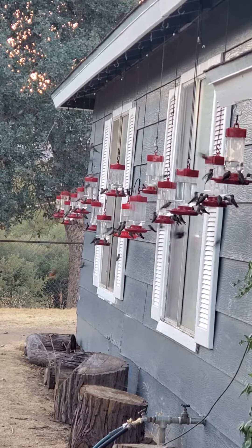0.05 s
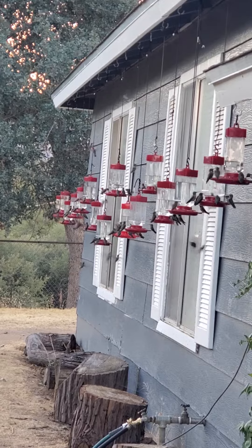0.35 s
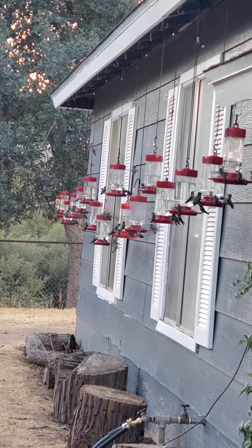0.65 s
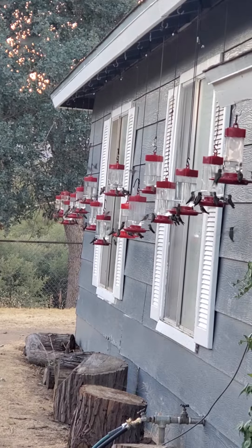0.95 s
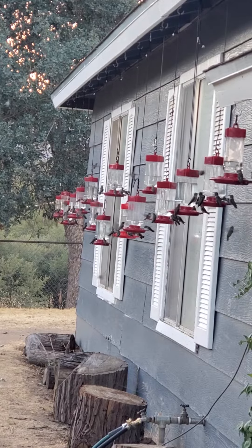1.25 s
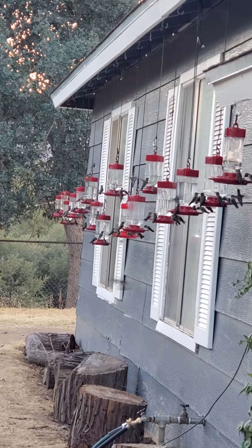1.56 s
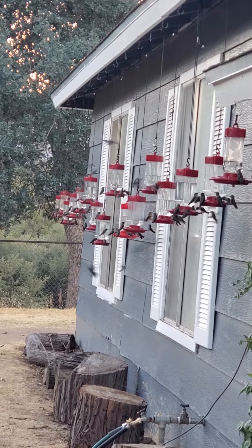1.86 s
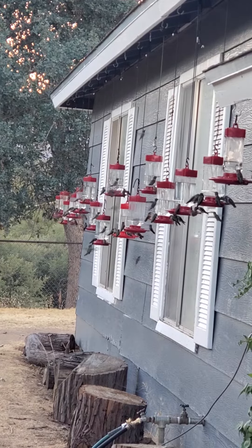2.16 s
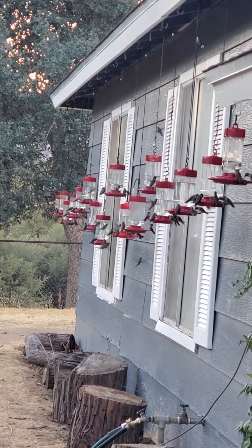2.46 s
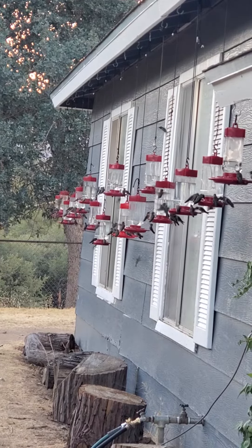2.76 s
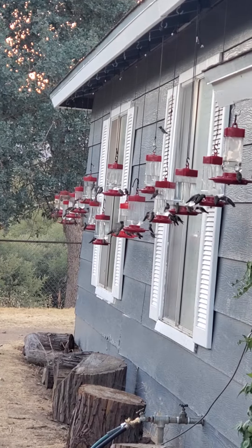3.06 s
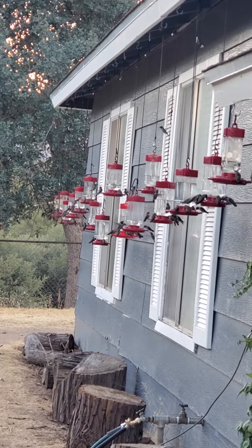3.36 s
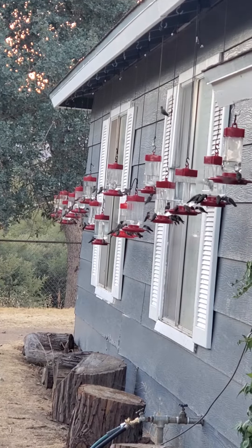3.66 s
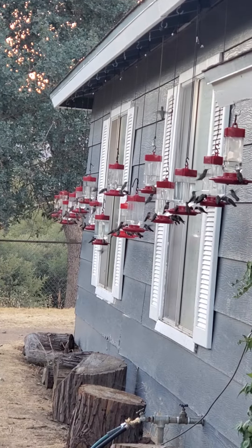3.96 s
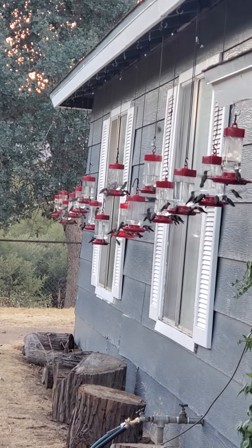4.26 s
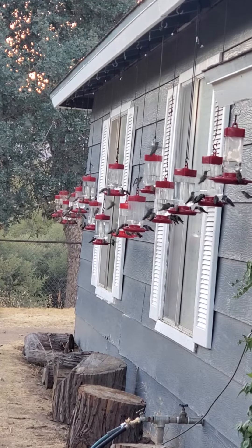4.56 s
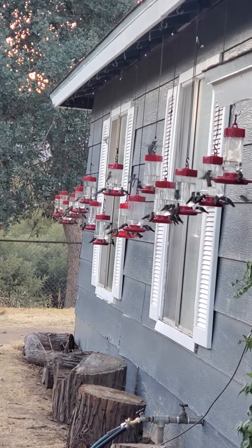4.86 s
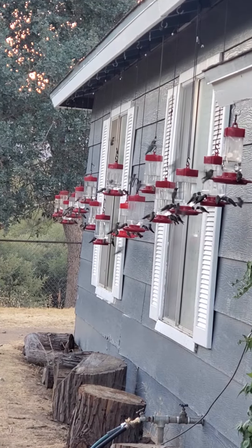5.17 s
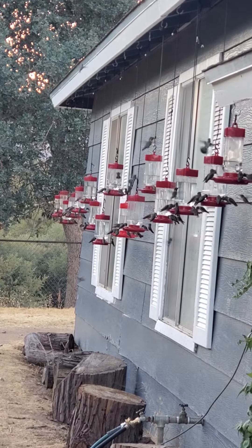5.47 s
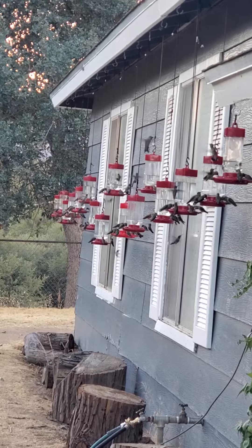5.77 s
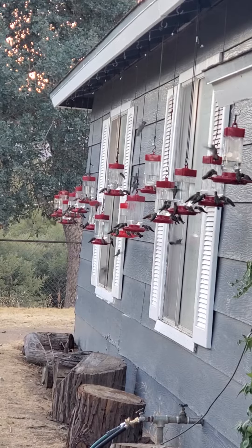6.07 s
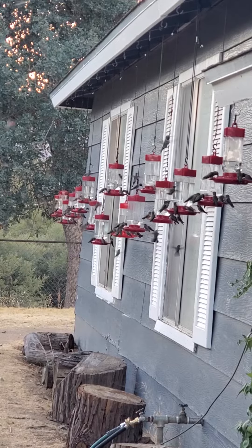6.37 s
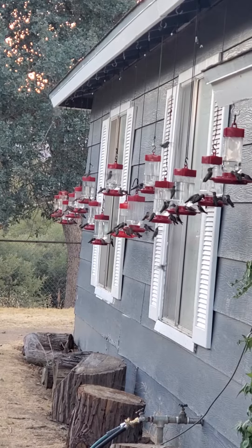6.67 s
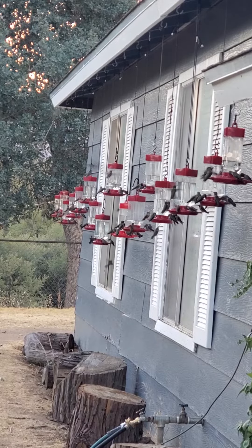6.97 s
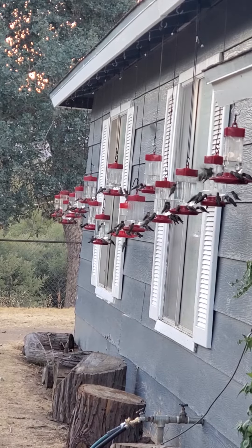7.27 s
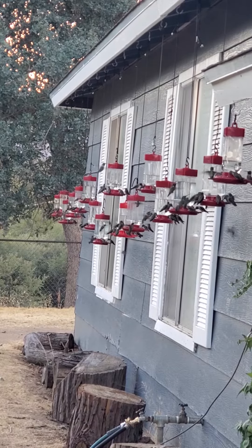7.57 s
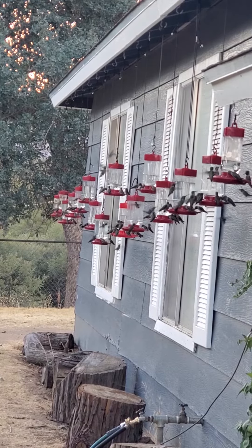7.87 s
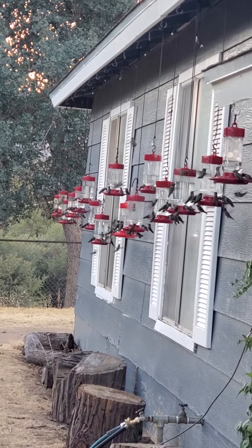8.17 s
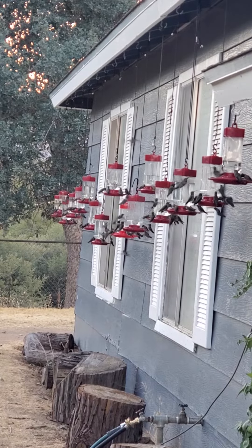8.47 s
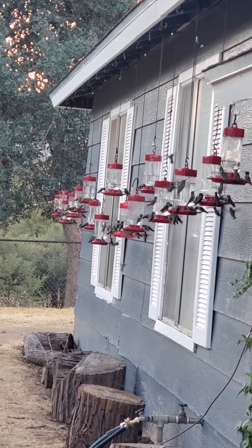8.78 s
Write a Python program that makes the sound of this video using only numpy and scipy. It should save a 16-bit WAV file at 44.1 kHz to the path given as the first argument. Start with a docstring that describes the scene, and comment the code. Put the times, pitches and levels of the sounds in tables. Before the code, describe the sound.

A crowd of hummingbirds squeaks and chatters around outdoor feeders while their wings hum and single birds whir past.

```python
"""Outdoors by a house wall, close to feeders crowded with hummingbirds, on a stereo microphone.
Their wings merge into a low hum over the hush of open air, and now and then one flies close by.
They chip, scold and buzz at each other with fast pitch sweeps of the syrinx, rasping with air;
others twitter at the far feeders. Wall, eaves and feeders scatter every call into short echoes."""
import sys
import numpy as np
from scipy import signal
from scipy.fft import rfft, irfft, next_fast_len
from scipy.io import wavfile
from scipy.ndimage import map_coordinates

SR = 44100
rng = np.random.default_rng(int(sys.argv[2]) if len(sys.argv) > 2 else 0)


def store_pcm(level_fs):
    """Save levels as 16-bit WAV."""
    pcm = np.round(np.clip(level_fs, -1, 1) * 32767).astype(np.int16)
    wavfile.write(sys.argv[1], SR, np.atleast_2d(pcm).T)


N = 393813
CALL_T = np.arange(SR // 4) / SR  # time within one call [s]


def amp(db):
    """Decibels to gain."""
    return 10 ** (np.asarray(db) / 20)


def unit(x):
    """x at rms 1."""
    return x / np.sqrt(np.mean(x ** 2) + 1e-20)


def along(points, hz):
    """Read (frequency, value) points at hz, on a log axis."""
    freqs, values = np.transpose(points)
    return np.interp(np.log(hz + 1), np.log(freqs + 1), values)


def wobble(rate, size=len(CALL_T), step=16):
    """A smooth random curve, rate knots a second."""
    knots = rng.standard_normal(int(max(size, len(CALL_T)) * rate / SR) + 4)
    coarse = np.arange(0, size + step, step)
    return np.interp(np.arange(size), coarse, map_coordinates(knots, [coarse * rate / SR]))


def filtered(x, response):
    """x through a gain that depends on frequency."""
    size = next_fast_len(N + SR // 4)
    return irfft(rfft(x, size) * response(np.fft.rfftfreq(size, 1 / SR)), size)[..., :N]


def spread(pair, spectrum):
    """Two signals, as mid and side, become a coloured stereo field of rms 1, near mono in the bass."""
    # how alike left and right are: (frequency [Hz], correlation)
    likeness = [(100, 0.95), (300, 0.92), (700, 0.62), (2000, 0.18), (8000, 0.24)]
    turn = lambda hz: np.arccos(np.clip(along(likeness, hz), -1, 1)) / 2
    mid, side = filtered(pair, lambda hz: amp(along(spectrum, hz)) * [np.cos(turn(hz)), np.sin(turn(hz))])
    return unit(np.array([mid + side, mid - side]))


def add(out, s, sound):
    """Mix a stereo sound in at time s."""
    span = out[:, max(round(s * SR), 0):][:, :sound.shape[1]]
    span += sound[:, :span.shape[1]]


def air(level_db=-61):
    """The steady hush of open air around the microphone."""
    # spectrum of the hush: (frequency [Hz], level [dB])
    spectrum = [(240, -80), (400, -3.5), (605, -22.5), (798, -14), (1070, -19.5), (1210, -15.5),
                (1370, -20), (2720, -18), (3820, -20.5), (5600, -19), (10500, -27), (15700, -26)]
    return amp(level_db + 0.13 * wobble(1.11, N)) * spread(rng.standard_normal((2, N)), spectrum)


def hovering(beat_hz, drift=.05, approach_db=1.0, harmonics=22):
    """One bird's wings: a wandering beat with many harmonics, swelling as it comes closer."""
    turns = np.cumsum(beat_hz * (1 + drift * wobble(3, N))) / SR
    k = np.arange(1, harmonics + 1)
    # down- and upstroke push almost alike, so even harmonics lead
    weights = np.where(k % 2, .6, 1) * np.exp(2j * np.pi * rng.random(harmonics))
    cycle = unit(irfft(np.append(0, weights), 2048))
    return cycle[(turns * len(cycle)).astype(int) % len(cycle)] * amp(approach_db * wobble(2.46, N))


def wings(gain_db=0.5, near_db=-55, whoosh_db=-8, stroke_hz=93, count=12):
    """The swarm's wingbeats blur into a low hum with some rushing air."""
    # loudness of the swarm: (time [s], level [dB])
    loudness = [(0.0, -49), (4.83, -50), (5.87, -54), (6.04, -50.5), (7.96, -53), (8.85, -53.5)]
    # colour of the hum: (frequency [Hz], gain [dB])
    colour = [(15, -36), (25, -24.5), (54, 0.5), (91, -3), (124, -2), (195, -6.5), (239, -10.5),
              (364, -11.5), (613, -24.5), (790, -26.5), (1070, -31), (1200, -16.5), (1400, -66),
              (1820, -67), (3080, -120)]
    level_db = np.interp(np.arange(N) / SR, *np.transpose(loudness))
    birds = np.array([hovering(hz) for hz in np.linspace(39, 51, count)])
    beats = np.array([birds.sum(0), (-1) ** np.arange(count) @ birds])  # mid and side
    whoosh = unit(filtered(rng.standard_normal((2, N)), lambda hz: hz < 1400))
    swarm = amp(level_db + gain_db) * spread(unit(beats) + amp(whoosh_db) * whoosh, colour)
    # the birds nearest the microphone stroke at slightly different rates and beat against each other
    rates = [stroke_hz * share * (1 + .05 * wobble(5, N)) for share in (.88, .98, 1.02, 1.07)]
    near = sum(np.sin(2 * np.pi * np.cumsum(hz) / SR) * amp(0.79 * wobble(3.3, N)) for hz in rates)
    return swarm + amp(near_db) * unit(near)


def syrinx(pitch, level_db, length, voice, rough, attack=0.0031, flutter_db=2, rasp_db=-21, hiss_db=6.5):
    """One call: harmonics on a trembling pitch with a dry rasp of air, opened and closed softly."""
    live = CALL_T < length + attack
    t = CALL_T[live]
    pitch = (pitch * (1 + rough * wobble(900)))[live]
    level_db = level_db[live] + flutter_db * wobble(300, len(t))
    phase = 2 * np.pi * np.cumsum(pitch) / SR
    tone = sum(amp(db) * np.sin(k * phase) * (k * pitch < SR / 2) for k, db in voice)
    # turbulence rides on the vibration and spreads it into a wide band
    rasp = wobble(6000, len(t), step=1) * np.sin(phase)
    hiss = np.diff(rng.standard_normal(len(CALL_T) + 1))[live]
    breath = unit(rasp) + amp(hiss_db) * unit(hiss)
    rasp_db = np.broadcast_to(rasp_db, CALL_T.shape)[live]
    gate = np.clip(t / attack, 0, 1) * np.clip((length + attack - t) / attack, 0, 1)
    return (unit(tone) + amp(rasp_db) * breath) * gate * amp(level_db)


def yard(call, db, direct_db=0, walls_db=0, tail_db=-3, wall_s=.008, lag_s=.00007, side_db=2, count=48):
    """A call reaches the microphone directly, off the wall and feeders, and as a short diffuse tail."""
    # decay of the tail: (frequency [Hz], time to fall 60 dB [s])
    decay = [(2000, 0.21), (4000, 0.28), (7000, 0.23), (10000, 0.26), (15000, 0.2)]
    size, sides = len(CALL_T), np.array([1, -1])
    # direct path and early bounces: each has its own delay, strength and direction
    delay = np.append(0, .001 + wall_s * rng.exponential(size=count))
    strength = np.append(amp(direct_db), amp(walls_db) * rng.choice([-1, 1], count) / np.sqrt(count))
    skew, lean = rng.standard_normal((2, count + 1, 1))
    arrival = np.clip((delay[:, None] + lag_s * (2 + skew * sides)) * SR, 0, size - 1).astype(int)
    early = np.zeros((2, size))
    np.add.at(early, (np.arange(2), arrival), strength[:, None] * amp(side_db * lean * sides / 2))
    hz, s, noise = signal.stft(rng.standard_normal((2, size)), SR, nperseg=128)
    tail = signal.istft(noise * amp(-60 * s / along(decay, hz)[:, None]), SR, nperseg=128)[1][:, :size]
    tail *= np.clip(CALL_T / 0.0092, 0, 1)
    wet_db = tail_db - .25 * (db + 45)  # faint birds are farther off, so more of their sound is scattered
    paths = early + amp(wet_db) * unit(tail) / np.sqrt(size)
    return amp(db) * signal.fftconvolve(call[None], paths, axes=1)


def chip(hold, plunge, top_hz, end_hz, whistle_db=-5, sag=0.0378, shake_hz=746, swell_db=6, close_db=6):
    """A held whistle swells and sags, then breaks into a rasp as the pitch shakes and drops."""
    # the whistle and its octave: (harmonic, level [dB])
    voice = [(1, 0), (2, -20)]
    held = np.clip(CALL_T / hold, 0, 1)
    fall = np.clip((CALL_T - hold) / plunge, 0, 1)
    broken = np.clip(4 * fall, 0, 1)
    shake = 0.356 * broken * np.sin(2 * np.pi * shake_hz * CALL_T + wobble(403.6))
    pitch = top_hz * (1 + sag * (.5 - held)) * (end_hz / top_hz) ** np.clip(fall ** .5 + shake, 0, 1)
    level_db = whistle_db * (1 - broken) - swell_db * (1 - held) ** 2 - close_db * fall ** 4
    # high whistles are strained and break harshly; low ones keep a steadier pitch
    strain = np.clip((top_hz - 5500) / 3000, .25, 1)
    rough = strain * (.018 + .05 * broken)
    return syrinx(pitch, level_db, hold + plunge, voice, rough, rasp_db=-8.5 - 2 * strain * broken)


def far_twitter(level_db=-62.5, scatter_db=3, count=105):
    """Birds at the far feeders chip at random, on a high note or a low one, more echo than direct."""
    out = np.zeros((2, N))
    for k, (when, register, hold, loud) in enumerate(rng.random((count, 4))):
        top_hz = (9300 if register > .6 else 7400) * (.92 + .16 * hold)
        call = chip(.006 + .01 * hold, .018, top_hz, end_hz=5000)
        db = level_db + scatter_db * (2 * loud - 1)
        add(out, (k + when) / count * N / SR, yard(call, db, direct_db=-6, tail_db=-1))
    return out


def warble(length, centre_hz, db, swing_hz, rate_hz, fade_db, octave_db, rasp_db=-18):
    """A call in the yard whose pitch flips between two registers, loudest at the turns, most at the low."""
    progress = np.clip(CALL_T / length, 0, 1)
    phase = 2 * np.pi * np.cumsum(rate_hz * (1 + 0.064 * wobble(42.7))) / SR
    pitch = centre_hz + swing_hz * np.cos(phase)
    level_db = fade_db * progress + 3 * np.cos(2 * phase) - 1.5 * np.cos(phase)
    call = syrinx(pitch, level_db, length, [(1, 0), (2, octave_db)], rough=.02, attack=.006)
    return yard(call, db, direct_db=-3, walls_db=-2, tail_db=-6)


def buzzes(gain_db=2.5):
    """Short chase calls: a wide warble, too fast to follow."""
    # (time [s], length [s], low pitch [Hz], high pitch [Hz], warble rate [Hz], unused, level [dB])
    calls = [(0.048, 0.033, 6830, 11340, 270, 0, -39.5), (2.379, 0.02, 4990, 6420, 330, -12, -45.5),
             (7.107, .046, 5580, 8260, 210, -4, -46.5), (7.276, 0.046, 5570, 6470, 210, -9, -49),
             (7.458, 0.036, 5420, 6460, 210, -10, -53.5)]
    out = np.zeros((2, N))
    for s, length, low_hz, high_hz, rate_hz, _, db in calls:
        centre_hz, swing_hz = (high_hz + low_hz) / 2, (high_hz - low_hz) / 2
        add(out, s, warble(length, centre_hz, db, swing_hz, rate_hz, fade_db=-2, octave_db=-5))
    return amp(gain_db) * out


def scolds(start_hz=3750, end_hz=1900, length=.026, arch_db=10, gain_db=3):
    """A scolding bird's fast, even run of downward slurs, each loudest near its middle."""
    # the slurs: (time [s], level [dB])
    calls = [(0.058, -40), (0.158, -39.5), (0.239, -39.5), (0.31, -43), (0.379, -39), (0.447, -39.5),
             (0.515, -41), (0.584, -41), (0.657, -44.5)]
    # their timbre, strongest on the third: (harmonic, level [dB])
    voice = [(1, -1), (2, -3), (3, 7), (4, -3), (5, 0.5), (6, -6)]
    out = np.zeros((2, N))
    progress = np.clip(CALL_T / length, 0, 1)
    pitch = start_hz + (end_hz - start_hz) * progress
    level_db = -arch_db * (2 * progress - .85) ** 2
    for s, db in calls:
        call = syrinx(pitch, level_db, length, voice, rough=0.011, rasp_db=-16.5)
        add(out, s, yard(call, db, walls_db=-3, tail_db=-2.5))
    return amp(gain_db) * out


def seeps(gain_db=1):
    """Thin high whistles, all of one shape, that sink only slowly."""
    # the whistles: (time [s], level [dB])
    calls = [(.082, -44.5), (0.55, -39.5), (1.857, -54.5), (2.029, -43.5), (2.19, -49), (2.411, -54),
             (2.517, -53), (2.676, -48), (4.309, -56.5), (8.007, -59.5)]
    out = np.zeros((2, N))
    for s, db in calls:
        add(out, s, yard(chip(hold=0.018, plunge=0.025, top_hz=9200, end_hz=7160, whistle_db=-1), db))
    return amp(gain_db) * out


def chips(length_s=.028, high_hz=9470, shortest_hold_s=0.0059, gain_db=0.5):
    """Contact notes at the near feeders, often in runs of a strong high note and a weak low one in turn."""
    # the notes: (time of the break [s], whistle pitch [Hz], plunge [s], level [dB])
    calls = [(.143, 7060, 0.024, -49), (.245, 9600, .02, -44), (0.397, 9800, 0.021, -45),
             (.428, 8700, 0.012, -40), (0.563, 9100, 0.016, -48), (.649, 8000, 0.0092, -49.5),
             (0.731, 9300, 0.01, -41.5), (0.799, 8480, 0.012, -44), (.881, 9260, 0.011, -44),
             (.963, 8370, 0.014, -48.5), (1.044, 9400, 0.014, -44), (1.122, 8400, 0.013, -49.5),
             (1.219, 9070, 0.012, -44), (1.326, 9260, 0.011, -43), (1.444, 9650, 0.0085, -44),
             (2.374, 9690, 0.011, -40.5), (4.176, 9570, 0.019, -51.5), (4.288, 9740, .012, -49),
             (4.397, 9700, 0.019, -49), (4.506, 9970, 0.017, -52), (4.971, 7290, 0.008, -51),
             (5.147, 9460, .014, -56), (5.233, 7200, 0.01, -57), (5.316, 9770, 0.026, -57),
             (5.401, 7140, 0.013, -58), (5.483, 9600, 0.014, -55), (5.574, 6960, 0.018, -62.5),
             (5.661, 9540, 0.013, -54.5), (5.755, 6700, 0.0093, -61), (5.836, 9220, 0.0086, -55),
             (5.937, 7060, .012, -59), (6.022, 9240, 0.016, -54.5), (6.12, 7320, 0.015, -55.5),
             (6.189, 8830, 0.012, -55), (6.213, 7650, .011, -52), (6.282, 7080, 0.012, -57.5),
             (6.364, 9240, 0.02, -52), (6.438, 7100, 0.0081, -54), (7.023, 10540, 0.021, -46.5),
             (7.113, 10400, 0.013, -48), (7.206, 7250, 0.012, -47), (7.284, 9460, .01, -47.5),
             (7.378, 7550, .018, -52.5), (7.459, 9600, 0.0095, -53), (7.551, 7540, 0.01, -58),
             (7.628, 9450, 0.024, -60.5), (7.924, 9900, 0.0089, -60), (8.256, 9800, 0.013, -58.5),
             (8.519, 10400, 0.0062, -58), (8.574, 9700, 0.02, -47.5), (8.675, 10900, .012, -55)]
    out = np.zeros((2, N))
    for break_s, top_hz, plunge, db in calls:
        # higher notes last longer, and the whistle takes what the plunge leaves
        hold = max(length_s * (top_hz / high_hz) - plunge, shortest_hold_s)
        call = chip(hold, plunge, top_hz, end_hz=5664)
        add(out, break_s - hold, yard(call, db, direct_db=-0.5, walls_db=-0.5, wall_s=.005))
    return amp(gain_db) * out


def trills(gain_db=2.5):
    """Thin shivering notes: a narrow, slower warble."""
    # the notes: (time [s], length [s], pitch [Hz], level [dB])
    calls = [(0.228, 0.1, 4410, -56.5), (3.419, 0.15, 4446, -58.5), (4.354, 0.083, 4430, -60.5),
             (5.847, 0.061, 5830, -57.5)]
    out = np.zeros((2, N))
    for s, length, hz, db in calls:
        add(out, s, warble(length, hz, db, swing_hz=180, rate_hz=64, fade_db=-1.5, octave_db=-22))
    return amp(gain_db) * out


def fly_bys(beat_hz=48.22, doppler=.03):
    """A bird passing close to the microphone swells and fades, its wingbeat dropping as it goes."""
    # the passes: (time when closest [s], half length [s], level [dB])
    passes = [(0.253, 0.18, -56), (1.259, 0.13, -52), (1.752, 0.11, -51), (2.679, .11, -53.5),
              (3.377, 0.1, -52.5), (6.344, 0.11, -66), (7.151, 0.082, -55.5), (8.554, 0.2, -54.5),
              (8.9, 0.068, -55.5)]
    # colour of wings up close: (frequency [Hz], gain [dB])
    colour = [(30, -50), (80, -9), (170, 3.5), (330, -5), (480, -8), (700, -26), (1400, -21), (2500, -70)]
    t, direct = np.arange(N) / SR, np.zeros(N)
    for s, half, db in passes:
        position = (t - s) / half
        strokes = hovering(beat_hz * (1 - doppler * np.tanh(position)), drift=.02, approach_db=2)
        direct += amp(db) * strokes / (1 + position ** 2)
    direct *= 1 + wobble(300, N)  # each stroke pushes a puff of air
    off_wall = np.roll(direct, SR // 50)
    return np.std(direct) * spread(np.array([direct, off_wall]), colour)


def tews(settle_s=.0036, droop=0.155, fade_db=-2, onset_db=9, rasp_db=-10):
    """From a tense, accented start the pitch relaxes quickly towards a low whistle, which droops on."""
    # (time [s], length [s], low note [Hz], start pitch over low note [ratio], overtones [dB], level [dB])
    calls = [(1.162, 0.014, 2300, 2.8, -5, -65), (1.824, 0.014, 2490, 4.9, -1, -55.5),
             (1.842, 0.02, 2160, 2.6, -5, -56.5), (1.93, 0.022, 2400, 3.3, 4, -59),
             (1.953, .025, 2030, 2.4, 5, -57), (2.068, 0.043, 2090, 1.05, -3, -56.5),
             (2.165, 0.048, 1960, 4.6, -7, -59), (2.264, .018, 1710, 1.75, -2, -53),
             (2.284, 0.014, 2264, 3.3, 5, -51.5), (2.441, 0.051, 2075, 2.7, -4.5, -56),
             (2.574, 0.049, 2085, 3.5, -4, -58), (2.65, 0.031, 1736, 3.4, -2, -55.5),
             (2.751, 0.034, 2052, 2.54, 2, -53), (2.904, 0.018, 2070, 3, -7, -56.5),
             (2.988, 0.028, 2097, 3.1, -1, -50), (3.21, .014, 2490, 3.2, 3, -63),
             (3.275, 0.019, 1920, 1.6, -3, -64), (3.369, 0.013, 2213, 4, 0, -52.5),
             (3.417, 0.013, 1695, 2.3, 2, -59.5), (3.437, 0.023, 1804, 1.4, -6, -59.5),
             (3.473, 0.0056, 2620, 3.4, -5, -47.5), (3.486, 0.011, 2425, 3.1, -2, -57),
             (3.578, 0.049, 1674, 0.89, -11.5, -61.5), (4.182, 0.021, 2250, 4, 4, -61.5),
             (4.292, 0.012, 2437, 2.7, 2, -56), (4.803, 0.041, 2260, 1.73, -3.5, -57),
             (6.019, 0.028, 2224, 2.6, -7, -64), (6.553, 0.013, 2350, 3.1, -4, -54.5),
             (6.625, 0.013, 2910, 1.14, -12, -66), (6.662, 0.023, 1790, 1.13, -10.5, -61.5),
             (7.235, 0.015, 1890, 1.6, -1, -66), (8.116, 0.0092, 2346, 3.15, -2, -56),
             (8.353, 0.017, 2285, 3.1, -4, -61.5), (8.6, 0.012, 2286, 3.1, 1, -54.5)]
    # their timbre: (harmonic, level [dB])
    timbre = [(1, -3.5), (2, -2.5), (3, -2.5), (4, -9), (5, -3)]
    # tews are duller than other calls: (frequency [Hz], gain [dB])
    muffle = [(7000, 5.5), (10000, -1), (15000, 4)]
    out = np.zeros((2, N))
    tension = np.exp(-CALL_T / settle_s)
    for s, length, end_hz, leap, overtones_db, db in calls:
        progress = np.clip(CALL_T / length, 0, 1)
        pitch = end_hz * (1 + droop * (.7 - progress) + (leap - 1) * tension)
        voice = [(k, level + overtones_db * (k > 1)) for k, level in timbre]
        call = syrinx(pitch, fade_db * progress + onset_db * tension, length, voice,
                      rough=.05, attack=.004, flutter_db=3, rasp_db=rasp_db + overtones_db)
        add(out, s, yard(call, db, direct_db=.5, walls_db=-1.5, tail_db=-6, wall_s=.014))
    return filtered(out, lambda hz: amp(along(muffle, hz)))


def churrs(length=0.028, fade_db=-2):
    """Short hoarse barks: the harmonics of a low, rough note blur into one wide band."""
    # the barks: (time [s], pitch [Hz], level [dB])
    calls = [(1.187, 1978, -45), (1.272, 1850, -51), (2.721, 2250, -55.5), (6.117, 2710, -65.5)]
    # their timbre: (harmonic, level [dB])
    voice = [(1, 10), (2, 3.5), (3, 6.5), (4, -1), (5, -8)]
    out = np.zeros((2, N))
    for s, hz, db in calls:
        call = syrinx(hz, fade_db * CALL_T / length, length, voice, rough=0.144, attack=0.0098, rasp_db=-10)
        add(out, s, yard(call, db, direct_db=6, walls_db=-5, tail_db=-8.5))
    return out


def rattle(rate_hz=97, octave_db=-5, return_db=-12, gain_db=2.5):
    """A chasing bird sweeps down again and again, much quieter on each way back up."""
    # course of the run: (time [s], top pitch [Hz], foot pitch [Hz], level [dB])
    course = [(1.582, 9270, 5330, -46), (1.601, 9110, 5480, -35.5), (1.655, 9180, 5760, -38.5),
              (1.69, 8780, 5650, -40.5), (1.735, 8440, 5550, -42.5), (1.777, 8400, 5400, -41)]
    out = np.zeros((2, N))
    s, *columns = np.transpose(course)
    top_hz, foot_hz, run_db = [np.interp(s[0] + CALL_T, s, column) for column in columns]
    phase = 2 * np.pi * rate_hz * CALL_T
    pitch = foot_hz + (top_hz - foot_hz) * (1 + np.cos(phase)) / 2
    rising = np.clip(-np.sin(phase), 0, 1)
    level_db = run_db - run_db.max() + return_db * rising
    call = syrinx(pitch, level_db, s[-1] - s[0], [(1, 0), (2, octave_db)], rough=0.012)
    add(out, s[0], yard(call, run_db.max(), walls_db=-3.5, tail_db=-11, wall_s=.005))
    return amp(gain_db) * out


def screeches(start_hz=6500, rise_hz_per_s=24000, gain_db=2.5):
    """Rising chase notes, made hoarse by a very fast warble."""
    # the notes: (time [s], length [s], level [dB])
    calls = [(2.007, 0.024, -47), (2.846, 0.048, -39), (3.107, 0.03, -48)]
    out = np.zeros((2, N))
    pitch = start_hz + rise_hz_per_s * CALL_T
    for s, length, db in calls:
        add(out, s, warble(length, pitch, db, swing_hz=644, rate_hz=620, fade_db=-1, octave_db=-5.5))
    return amp(gain_db) * out


def peeps(end_hz=2440, octave_db=-8, fade_db=-19, gain_db=1):
    """Clean whistles with a clear octave, held on one pitch and then falling ever faster."""
    # the whistles: (time [s], hold [s], pitch [Hz], drop [s], level [dB])
    calls = [(2.336, 0.0032, 10000, 0.0082, -37), (2.644, 0.007, 5830, 0.0084, -42),
             (2.835, 0.0028, 5850, 0.011, -41.5), (4.618, 0.021, 5920, .017, -45),
             (4.691, .016, 5970, 0.032, -43.5), (5.871, 0.0021, 5850, 0.011, -44.5)]
    out, voice = np.zeros((2, N)), [(1, 0), (2, octave_db)]
    for s, hold, hz, drop, db in calls:
        fall = np.clip((CALL_T - hold) / drop, 0, 1)
        pitch = hz + (end_hz - hz) * fall ** 2
        call = syrinx(pitch, fade_db * fall, hold + drop, voice, rough=0.014, rasp_db=-15)
        add(out, s, yard(call, db, direct_db=1.5, walls_db=-3, tail_db=-8))
    return amp(gain_db) * out


def scene():
    """Calls near and far, coloured by throat and beak, over wings and open air."""
    # how well throat and beak radiate: (frequency [Hz], gain [dB])
    beak = [(1200, -19), (1700, -2), (3200, 1), (4200, -0.5), (5500, 1.5), (9300, 1.5), (10800, -2),
            (15000, -6)]
    calls = rattle() + chips() + seeps() + peeps() + scolds() + tews() + churrs()
    calls += buzzes() + screeches() + trills() + far_twitter()
    return filtered(calls, lambda hz: amp(along(beak, hz))) + wings() + fly_bys() + air()


def record(dry, top_hz=15811):
    """The recorder keeps nothing above its band limit."""
    return filtered(dry, lambda hz: hz < top_hz)


dry = scene()
out = record(dry)
store_pcm(out)
```